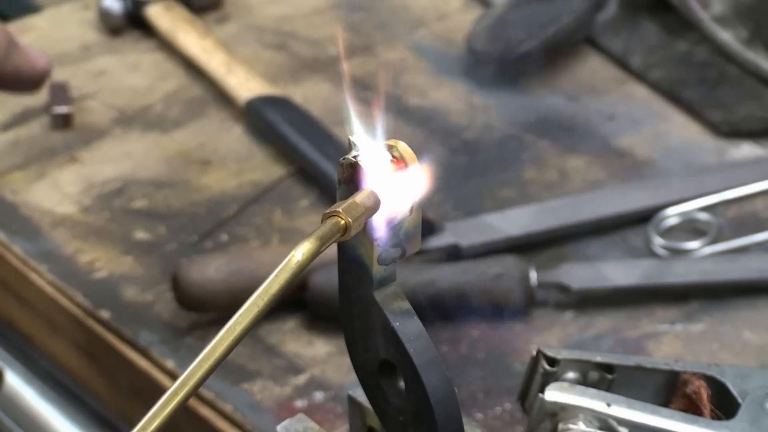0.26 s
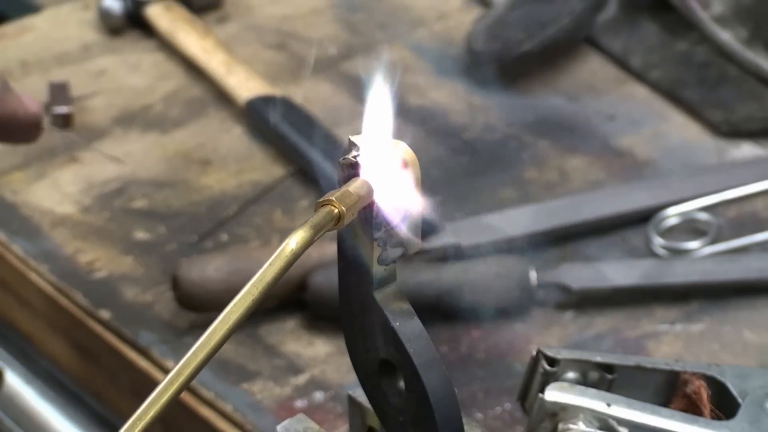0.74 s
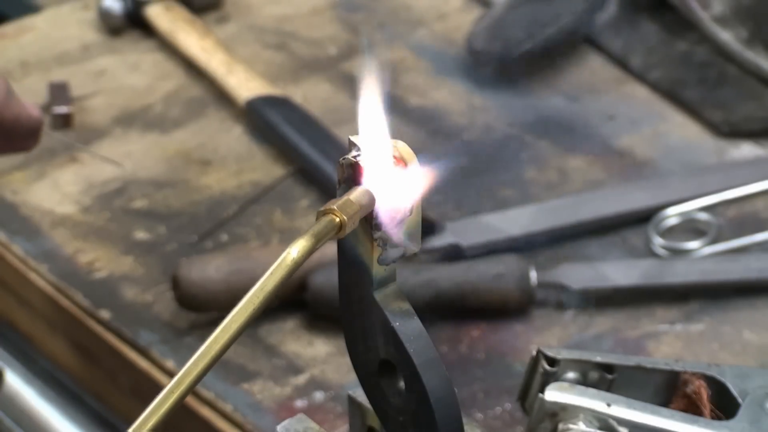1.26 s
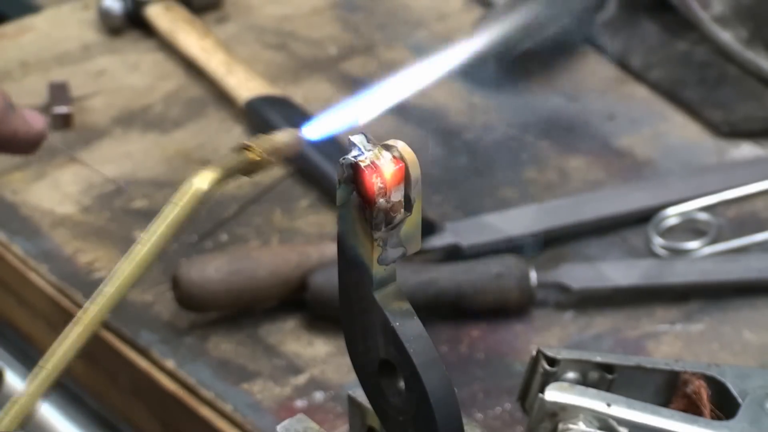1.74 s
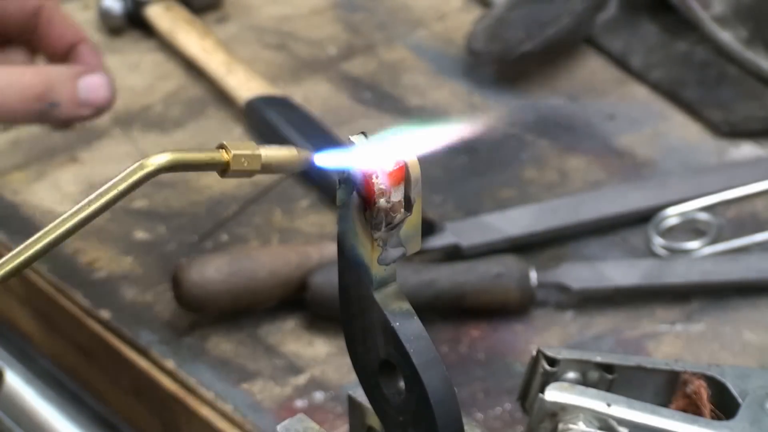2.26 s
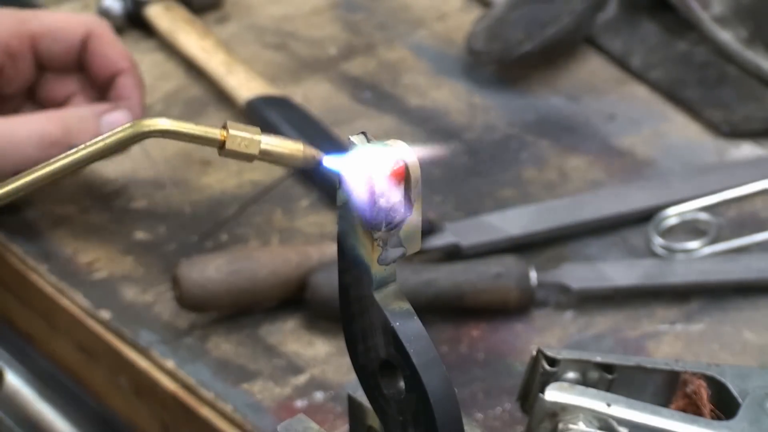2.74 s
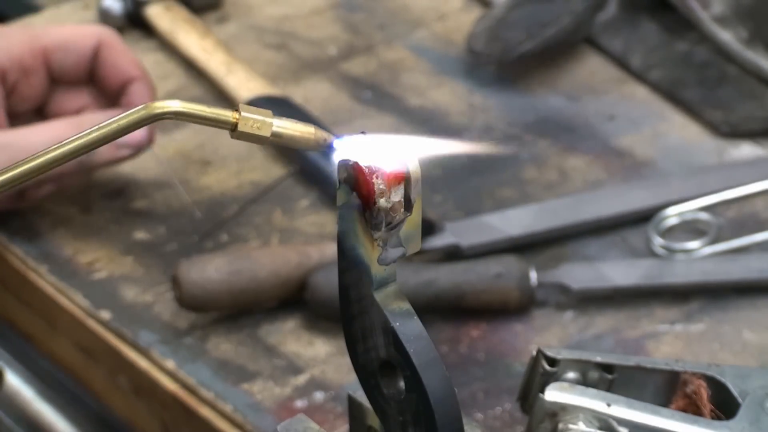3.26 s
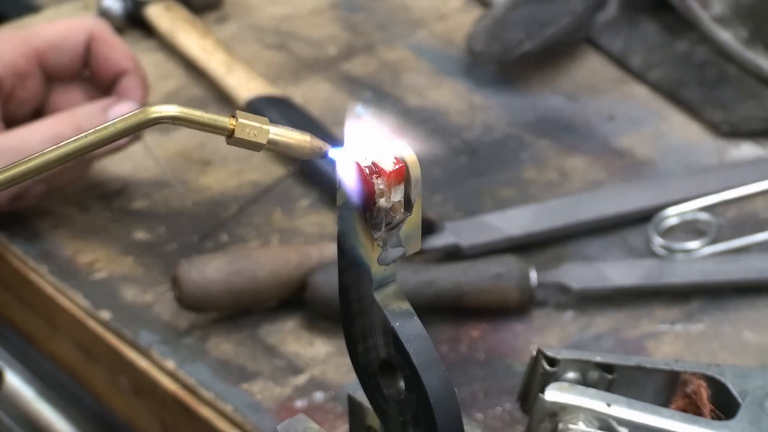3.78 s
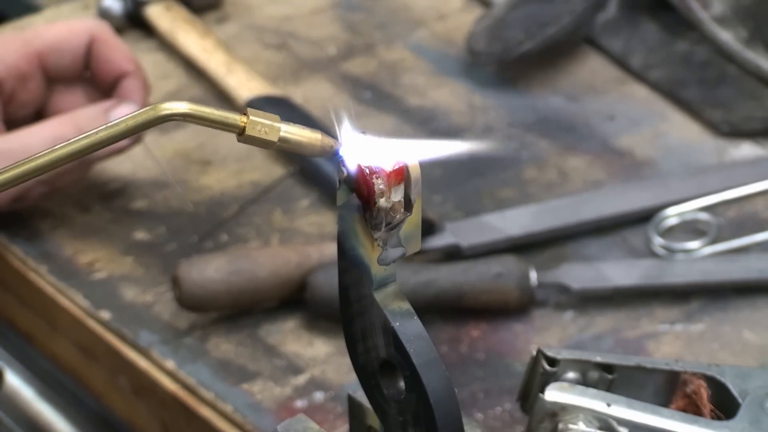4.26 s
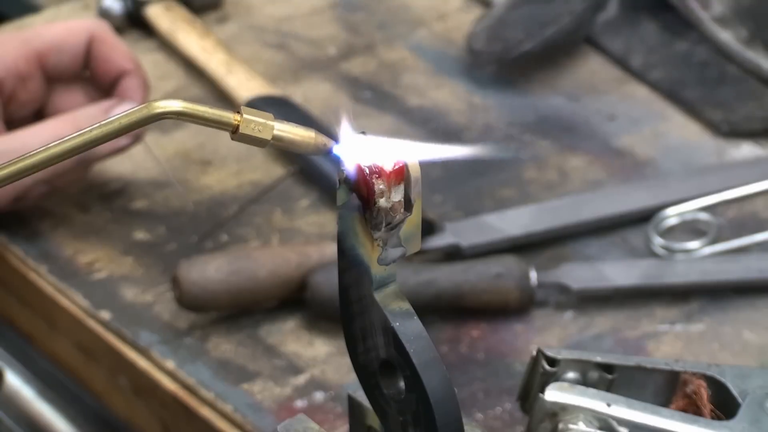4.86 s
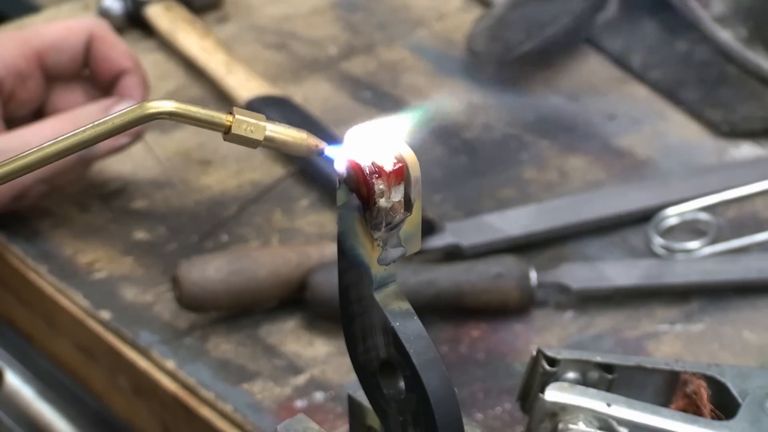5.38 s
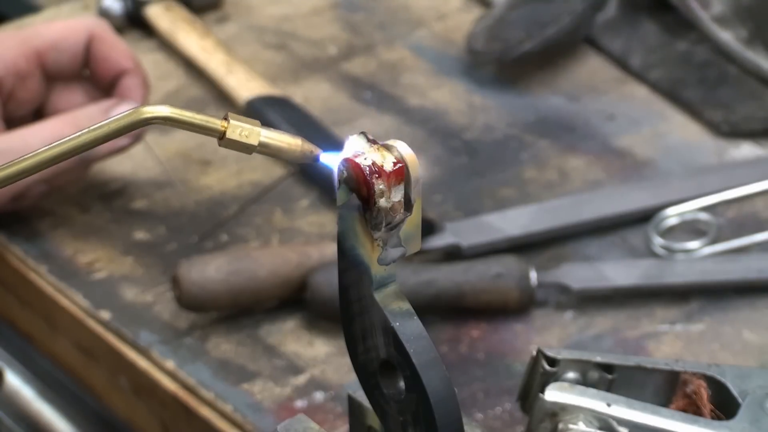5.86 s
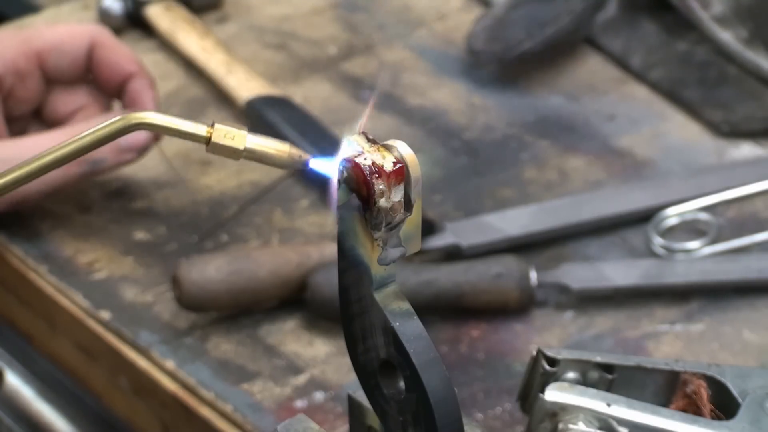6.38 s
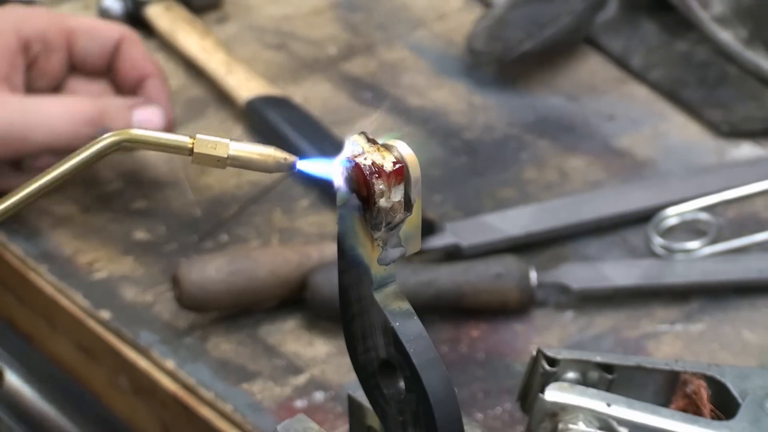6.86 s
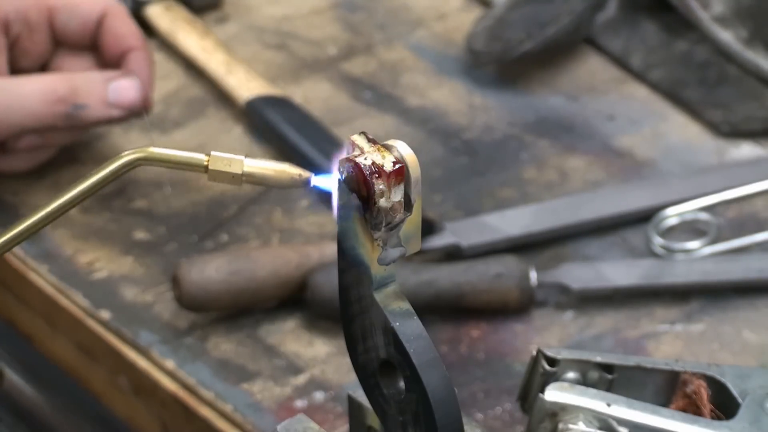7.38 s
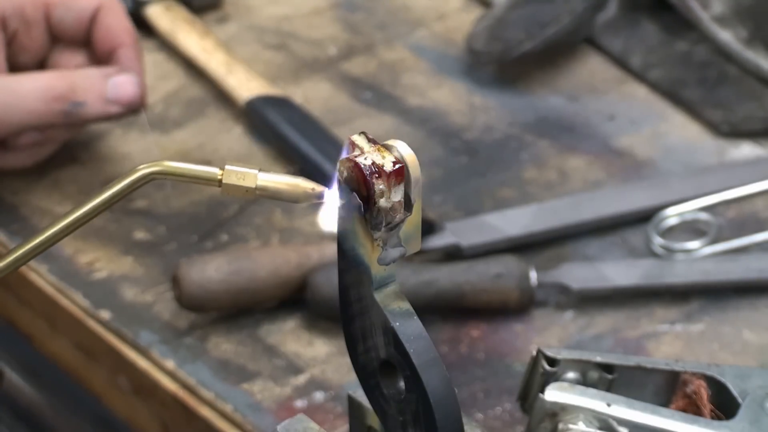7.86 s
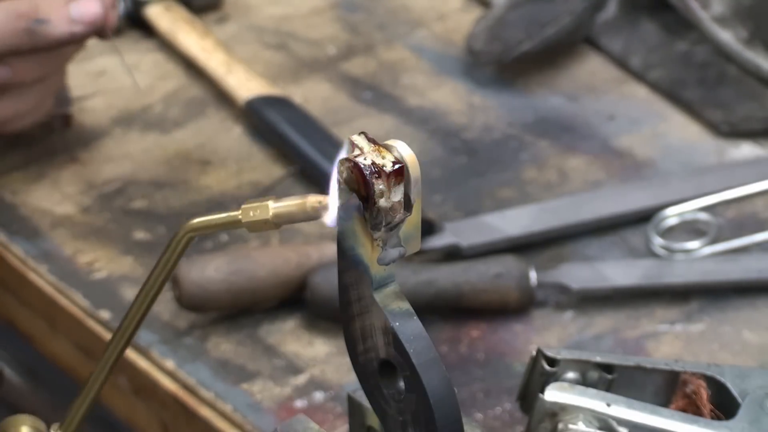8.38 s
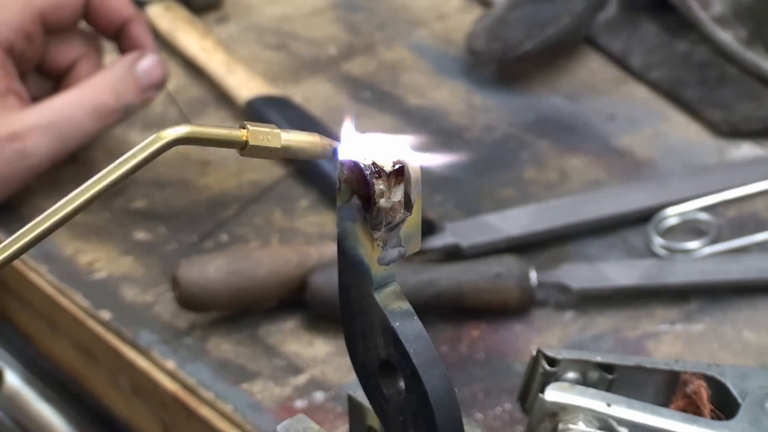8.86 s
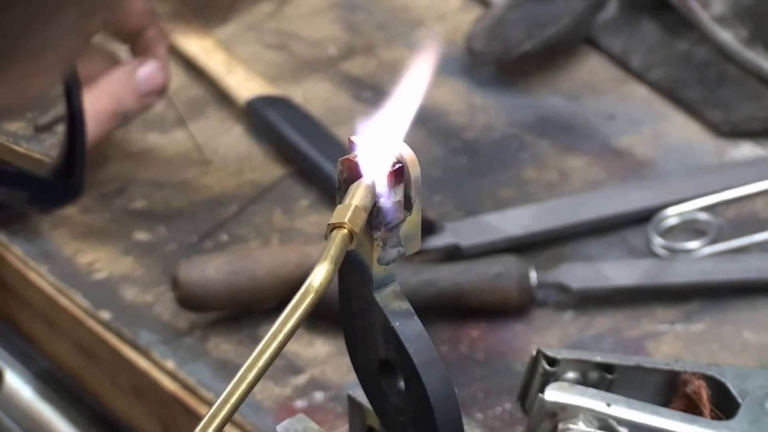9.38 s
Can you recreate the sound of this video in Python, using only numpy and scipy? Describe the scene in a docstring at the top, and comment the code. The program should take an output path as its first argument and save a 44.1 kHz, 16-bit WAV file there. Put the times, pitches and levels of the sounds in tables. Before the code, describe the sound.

Close, steady, bright torch hiss with faint low flutter and a few soft thuds, jumping at about eight seconds to a loud rushing flame.

```python
"""In a workshop, a gas torch heats a steel joint held in pliers over a bench.
The jet, band-shaped noise, hisses, flares and sputters on the steel; slower-fluttering noise forms a low rumble.
Filtered clicks ring damped modes as three dull knocks. At 8.1 s the flame turns turbulent at a stroke:
broadband noise with a shifting echo rushes loudly and briefly falters. Bench and workshop echo closely."""
import sys
import numpy as np
from scipy import signal
from scipy.fft import rfft, irfft, next_fast_len
from scipy.io import wavfile
from scipy.ndimage import map_coordinates

SR = 44100
rng = np.random.default_rng(int(sys.argv[2]) if len(sys.argv) > 2 else 0)


def put_to_file(sound):
    """Save the sound as 16-bit audio at rate SR, in the file named by the first command-line argument."""
    columns = np.atleast_2d(sound).T  # one column per channel
    safe = np.clip(columns, -1, 1)
    whole_steps = np.round(safe * 32767)
    wavfile.write(sys.argv[1], SR, whole_steps.astype(np.int16))


N = 424241
TIME = np.arange(N) / SR
SIZE = next_fast_len(N + SR // 2, True)
FREQS = np.fft.rfftfreq(SIZE, 1 / SR)

# All levels are relative, ahead of trims in the functions; spectra are densities per Hz.
# Dull knocks at the bench: t/s, level/dB, contact cut-off f/Hz, thud level/dB
KNOCKS = [(1.856, -51, 400, -70), (2.354, -52, 1500, -41.5), (2.769, -26.5, 2000, -43.5)]
# Modes a knock excites: f/Hz, level/dB, t60/s
KNOCK_MODES = [(564, -15, .14), (710, -13, 0.1), (840, 0.5, 0.024), (945, 0, 0.022), (1080, -19, 0.024)]
# Thud of the bench: f/Hz, level/dB
THUD_SPECTRUM = [(100, -12), (160, 2), (400, -3), (800, -5), (1300, 0), (1700, -12), (4000, -27)]

# Air drawn in by the smooth flame: f/Hz, level/dB
DRAUGHT_SPECTRUM = [(35, -24), (65, -2.5), (95, 4.5), (125, -6.5), (155, -3.5), (200, -39), (400, -45)]
# Deep draught once the torch is side-on: f/Hz, level/dB
DEEP_SPECTRUM = [(20, -1), (42, -2), (60, 0), (90, -20)]
# Soft blowing of the smooth flame: f/Hz, level/dB
BLOW_SPECTRUM = [(330, -45), (440, -6), (550, -4), (820, -1.5), (1100, -4.5), (1350, -5), (1550, 0),
                 (1900, -2.5), (2200, 2), (3500, -6.5), (7000, -5.5)]
# Rumble of the smooth flame: f/Hz, level/dB
RUMBLE_SPECTRUM = [(100, -13), (160, 1.5), (220, -3), (290, 1), (400, 1), (800, -11.5), (2000, -15)]
# Rumble, most when burning free, least when pressed flat on the steel: t/s, level/dB
RUMBLE = [(0.0, -62.5), (0.66, -70), (1.1, -62.6), (1.68, -72.5), (1.86, -59.6), (3.3, -61.5), (3.48, -74),
          (4.02, -63), (4.46, -73.6), (4.7, -66.4), (4.9, -78), (5.04, -61), (5.2, -67.5), (8.08, -62.5)]
# The rumble dies away briefly: middle t/s, length/s, depth/dB
LULLS = [(.64, .14, 16), (1.43, 0.18, 9), (3.1, 0.17, 10), (4.59, .16, 20), (6.45, 0.15, 19)]

# Jet as it plays over the steel: t/s, jet level/dB, edge sizzle level/dB
JET = [(0.0, -22, -34.8), (1.04, -23, -36), (1.16, -21, -35.0), (2.34, -22.5, -37.6), (3.46, -21, -34),
       (3.92, -24.0, -38.4), (4.16, -21.5, -36), (4.56, -22, -37), (4.94, -20.5, -27), (5.04, -23, -34),
       (5.38, -20.5, -34), (5.52, -22.7, -39), (6.02, -22, -36.6), (6.14, -24, -41), (6.54, -21.5, -39),
       (6.98, -22, -36.2), (7.08, -23, -39.4), (8.08, -24, -39)]
# Splash, most while the jet points at the steel's face: t/s, level/dB
SPLASH = [(0, -34.5), (.55, -31.5), (.72, -36), (1.02, -31), (1.25, -35.5), (1.5, -34), (2.8, -34),
          (2.98, -36), (5.0, -35), (5.38, -34.5), (5.6, -35.5), (8.08, -34.5)]
# The jet slips off its edge and the hiss thins: middle t/s, length/s, depth/dB
SLIPS = [(.145, 0.053, 4.5), (.285, .05, 5), (3.11, .04, 3), (3.29, .05, 3), (3.61, .05, 3),
         (4.08, .06, 1.5), (4.41, 0.08, 1), (5.1, .05, 2)]
# The jet catches an edge: start t/s, hold/s, flare level/dB, sizzle gain/dB, rumble and draught loss/dB
FLARES = [(.088, .02, -42, 6, 6), (0.215, .02, -28, 4, 4), (0.305, 0.13, -24, 5, 4),
          (0.492, .05, -31, 2, 5), (1.47, .02, -30, 3, 0), (3.575, .015, -49, 6, 1),
          (3.64, 0.11, -28, 10, 28), (4.115, .025, -40, 6, -1), (5.26, .12, -33, 2, 5)]
# Free jet: f/Hz, level/dB
JET_SPECTRUM = [(2000, -30), (4000, -19), (5500, -15), (6400, -6), (7100, -2), (7800, -3), (9000, -2),
                (10300, 0), (11150, -0.5), (11650, 4.5), (12400, 0.5), (13400, 0), (14000, -11.5),
                (16000, -25)]
# Splash on the steel: f/Hz, level/dB
SPLASH_SPECTRUM = [(1200, -24.5), (2300, -14.5), (3500, -5.5), (4400, -2.5), (5300, 3), (6500, 5),
                   (9000, -15), (13000, -32)]
# Sizzle on the edges: f/Hz, level/dB
SIZZLE_SPECTRUM = [(8000, -29), (11000, -7), (13500, 5.5), (15000, 6), (16000, 3)]
# Flare on an edge: f/Hz, level/dB
FLARE_SPECTRUM = [(2800, -22), (4200, -6.5), (5200, 0.5), (7000, 2.5), (9000, -6), (11700, 4), (14000, -26)]

# Turbulent flame: t/s, roar level/dB, hiss level/dB
RUSH = [(8.1, -27, -23.5), (8.3, -28, -24), (8.42, -29.5, -25.5), (8.64, -27.5, -23.5), (8.98, -27, -25),
        (9.12, -27, -23.5), (9.62, -28, -24)]
# Roar of the turbulent flame: f/Hz, level/dB
RUSH_SPECTRUM = [(20, -2.5), (120, -3), (260, 1), (430, -1), (780, -1.5), (1150, -1), (2700, -1.5),
                 (5000, -2), (7000, -6), (10000, -14), (16000, -24)]
# Bright hiss of the turbulent flame: f/Hz, level/dB
RUSH_HISS_SPECTRUM = [(3500, -26), (6000, -7), (8000, -3), (10000, 0), (12300, -1), (13200, -.5),
                      (14000, -1.5), (16000, -3)]
# Echo off the steel beside the turbulent flame: t/s, delay/ms, strength/1
STEEL_ECHO = [(8.1, 0.76, 0.1), (8.4, 0.59, 0.05), (8.6, 0.67, 0.1), (8.85, 0.7, 0.45), (9.1, 0.72, 0.37),
              (9.3, 0.63, 0), (9.45, 0.72, .24), (9.62, 0.69, 0.25)]
# The flame falters: deepest t/s, fade/s, recovery/s, depth/dB
FALTERS = [(8.433, 0.0099, 0.019, 6.5), (8.468, 0.025, 0.025, 13.5), (9.033, 0.023, 0.0063, 11)]

# Stereo side against mid, for smooth flame, jet and knocks: f/Hz, level/dB
WIDTH = [(20, -15), (120, -6.5), (400, -3.5), (750, -5), (1280, -4.5), (2000, -13.5), (3500, -17.5),
         (6500, -21), (8000, -15), (11100, -7.5), (11700, -22), (13200, -37), (14500, -20), (15600, -25)]
# Stereo side against mid, for the turbulent flame: f/Hz, level/dB
RUSH_WIDTH = [(60, -10), (250, -14.5), (700, -8.5), (1400, -13), (3500, -10), (8200, -7.5), (9400, -26),
              (15000, -36)]
# Stereo width over time: t/s, side level/dB
WIDTH_IN_TIME = [(0, 0.5), (5.3, -.5), (5.8, .5), (7.0, 0.5), (7.4, 1.5), (8.6, 1.5), (8.85, -1.3),
                 (9.62, -0.5)]

RUSH_START_S = 8.098
BENCH_ECHO_S, CUTOFF_HZ = .003448, 15800
FLARE_ATTACK_S, FLARE_RELEASE_S = .008, 0.06
SLIP_SIZZLE = 2.2   # dB of sizzle lost per dB of hiss
DRAUGHT_DB, DRAUGHT_FOLLOWS = -67, 0.35   # level; share of the rumble's swing in dB
BLOW_DB, BLOW_FOLLOWS = -49.5, 0.12   # level; share of the rumble's swing in dB
TURN_S, TURN_LENGTH_S, DEEP_DB = 1.3, .8, -69.5   # the torch swings side-on and a deep draught joins in
KNOCK_SIDE_DB = -9   # the knocks stand nearer the centre
GUTTER_DB, GUTTER_PER_S = 4, 5.9   # depth at one spread of the drift; its rate


def from_db(db):
    """Level law: twenty decibels are a factor of ten in amplitude."""
    return 10 ** (np.asarray(db) / 20)


def rms_one(x):
    """Normalization: division by the root mean square gives unit power."""
    return x / np.sqrt(np.mean(x ** 2) + 1e-20)


def in_time(rows):
    """Linear interpolation: each column of a time table is read at every sample."""
    s, *columns = np.transpose(rows)
    return [np.interp(TIME, s, c) for c in columns]


def dips(rows):
    """Raised-cosine windowing: brief, smooth losses in dB are summed."""
    loss_db = 0
    for middle, length, depth_db in rows:
        phase = np.pi * np.clip((TIME - middle) / length, -.5, .5)
        loss_db = loss_db + depth_db * np.cos(phase) ** 2
    return loss_db


def colour(points):
    """Spectral shaping: gain follows log frequency, with second-order skirts beyond the end points."""
    hz, db = np.transpose(points)
    gain = from_db(np.interp(np.log(FREQS + 1), np.log(hz), db))
    low_skirt = np.minimum(FREQS / hz[0], 1) ** 2
    high_skirt = (hz[-1] / np.maximum(FREQS, hz[-1])) ** 2
    return gain * low_skirt * high_skirt


def filtered(x, response):
    """Convolution theorem: filtering is multiplication of spectra."""
    return irfft(rfft(x, SIZE) * response, SIZE)[..., :N]


def drift(rate):
    """Low-passed random process: wander up to about `rate` times a second, with unit spread."""
    step = 40   # samples between computed points
    white = rfft(rng.standard_normal(SIZE // step))
    slow = irfft(white / (1 + (FREQS[:len(white)] / rate) ** 2))
    return np.interp(np.arange(N) / step, np.arange(len(slow)), rms_one(slow))


def turbulence(spectrum, flutter_db, flutter_rate):
    """Flow noise: passing eddies modulate noise, which is then coloured and set to unit rms."""
    eddies = from_db(flutter_db * drift(flutter_rate))
    return rms_one(filtered(rng.standard_normal(N) * eddies, colour(spectrum)))


def scattered(x, strength, longest_s, rate, count=8):
    """Interference: near reflections swell and fade, so ridges and hollows wander through the spectrum."""
    lags = np.linspace(longest_s / count, longest_s, count) * rng.uniform(.85, 1.15, count)
    echoes = sum(drift(rate) * np.roll(x, round(lag * SR)) for lag in lags) / np.sqrt(count)
    return (x + strength * echoes) / np.sqrt(1 + strength ** 2)


def spread(x, width, side_db):
    """Decorrelation: the side is the same sound, coloured by a width curve, delayed and smeared in phase."""
    smear = rfft(rng.standard_normal(N) * TIME * np.exp(-TIME / .012), SIZE)
    side = from_db(side_db) * filtered(x, colour(width) * smear / np.abs(smear))
    return np.array([x + side, x - side])


def workshop(x, t60, wet_db):
    """Reverberation: scattered reflections off tools and walls die away exponentially."""
    tail = rng.standard_normal(N) * from_db(-60 * TIME / t60) * (TIME > BENCH_ECHO_S)
    return from_db(wet_db) * filtered(x, rfft(tail / np.linalg.norm(tail), SIZE))


def ring(x, hz, t60):
    """Damped resonance: a unit click sets a sine of about unit height ringing."""
    r, w = from_db(-60 / (t60 * SR)), 2 * np.pi * hz / SR
    return signal.lfilter([0, np.sin(w)], [1, -2 * r * np.cos(w), r * r], x + 1e-18)


def knocks(thud_t60, slap_s, slap_db):
    """Modal excitation: each blow rings the modes, shakes the bench with a thud and echoes off a wall."""
    force, thud = np.zeros(N), np.zeros(N)
    for s, db, soft_hz, thud_db in KNOCKS:
        click = from_db(db) * (np.arange(N) == round(s * SR))
        contact = signal.butter(2, soft_hz, fs=SR, output="sos")
        force += signal.sosfilt(contact, click + 1e-18)
        thud += (TIME >= s) * from_db(thud_db - 60 * np.abs(TIME - s) / thud_t60)
    body = sum(from_db(db) * ring(force, hz, t60) for hz, db, t60 in KNOCK_MODES)
    small_body = signal.butter(2, [450, 1400], "band", fs=SR, output="sos")
    body = signal.sosfilt(small_body, body)
    body = body + from_db(slap_db) * np.interp(TIME - slap_s, TIME, body)
    thud = thud * rms_one(filtered(rng.standard_normal(N), colour(THUD_SPECTRUM)))
    return body + workshop(body, t60=0.39, wet_db=-1) + thud


def guttering():
    """Half-wave rectification: positive swings of a drift cut the gain; negative swings leave it whole."""
    return from_db(-GUTTER_DB * np.maximum(drift(GUTTER_PER_S), 0) ** 2)


def burning(quench_db):
    """Combustion noise: the smooth flame draws air, rumbles and blows; flares generally quench it."""
    rumble_db, = in_time(RUMBLE)
    swing_db = rumble_db - np.mean(rumble_db)
    side_on = np.clip((TIME - TURN_S) / TURN_LENGTH_S, 0, 1)
    draught_gain = from_db(DRAUGHT_DB + DRAUGHT_FOLLOWS * swing_db)
    draught = draught_gain * turbulence(DRAUGHT_SPECTRUM, flutter_db=1.5, flutter_rate=6)
    deep = side_on * from_db(DEEP_DB) * turbulence(DEEP_SPECTRUM, flutter_db=1.5, flutter_rate=6)
    rumble_gain = from_db(rumble_db - dips(LULLS) - quench_db + 3.0)
    rumble = rumble_gain * turbulence(RUMBLE_SPECTRUM, flutter_db=1.8, flutter_rate=10)
    blow_gain = from_db(BLOW_DB + BLOW_FOLLOWS * (swing_db - quench_db))
    blow = blow_gain * turbulence(BLOW_SPECTRUM, flutter_db=1.06, flutter_rate=24)
    air = from_db(-quench_db) * guttering() * (draught + deep)
    return air + scattered(guttering() * rumble + blow, strength=0.83, longest_s=.009, rate=3.5)


def steadiness():
    """Amplitude modulation: the flame sags for a moment and catches again."""
    sag_db = sum(np.interp(TIME, [s - fade, s, s + back], [0, db, 0]) for s, fade, back, db in FALTERS)
    return from_db(-sag_db)


def rush():
    """Comb filtering: a short, shifting echo off the steel hollows the turbulent flame's roar and hiss."""
    roar_db, hiss_db = in_time(RUSH)
    delay_ms, strength = in_time(STEEL_ECHO)
    roar = from_db(roar_db + 1.2) * turbulence(RUSH_SPECTRUM, flutter_db=1.0, flutter_rate=88)
    bright = from_db(hiss_db) * turbulence(RUSH_HISS_SPECTRUM, flutter_db=1.44, flutter_rate=83)
    flame = roar + bright
    delay_ms = delay_ms + 0.013 * drift(10)   # the flame trembles against the steel
    echo = map_coordinates(flame, [(TIME - delay_ms / 10 ** 3) * SR], order=3)
    return scattered(flame + strength * echo, strength=.3, longest_s=.002, rate=6)


def flaring():
    """Envelope gating: flares rise fast, hold and let go; yields flare gain, sizzle gain/dB, bass loss/dB."""
    gates = []
    for s, hold, *_ in FLARES:
        corners = [s - FLARE_ATTACK_S, s, s + hold, s + hold + FLARE_RELEASE_S]
        gates.append(np.interp(TIME, corners, [0, 1, 1, 0]))
    _, _, db, sizzle_db, quench_db = np.transpose(FLARES)
    return np.array([from_db(db), sizzle_db, quench_db]) @ np.array(gates)


def hiss(flare, more_sizzle_db):
    """Jet noise: the nozzle's jet splashes and sizzles on steel; hand tremor moves jet and sizzle together."""
    jet_db, sizzle_db = in_time(JET)
    splash_db, = in_time(SPLASH)
    tremor, slip_db = drift(9), dips(SLIPS)
    jet_db = jet_db - slip_db + 0.44 * tremor
    sizzle_db = sizzle_db - SLIP_SIZZLE * slip_db + 1.4 * tremor
    flare = flare * turbulence(FLARE_SPECTRUM, flutter_db=0.45, flutter_rate=70)
    jet = from_db(jet_db + 0.1) * turbulence(JET_SPECTRUM, flutter_db=0.5, flutter_rate=140)
    splash = from_db(splash_db) * turbulence(SPLASH_SPECTRUM, flutter_db=1.4, flutter_rate=18)
    sizzle_gain = from_db(sizzle_db + more_sizzle_db + 1.7)
    sizzle = sizzle_gain * turbulence(SIZZLE_SPECTRUM, flutter_db=0.5, flutter_rate=45)
    # the top and the sizzle flicker fast and irregularly, more deeply where the sizzle is louder
    flicker_db = 0.76 * from_db(sizzle_db - np.mean(sizzle_db))
    flicker = from_db(flicker_db * drift(80))
    top = filtered(jet, colour([(6500, -25), (8500, -5), (10000, 0), (20000, 0)]))
    whole = jet - top + flicker * (top + sizzle) + splash + flare
    return scattered(whole, strength=0.3, longest_s=.0022, rate=1.6)


def scene():
    """Superposition: the jet gives way to the rush over knocks and smooth flame, almost centred."""
    turbulent = np.clip((TIME - RUSH_START_S) / 0.0014, 0, 1)
    flare, sizzle_db, quench_db = flaring()
    side_db, = in_time(WIDTH_IN_TIME)
    jet = hiss(flare, sizzle_db) * steadiness() * (1 - 0.92 * turbulent)
    bench = 0.38 * np.roll(jet, round(BENCH_ECHO_S * SR))   # combs the hiss into fine ridges
    jet = .91 * (jet + bench + workshop(jet, t60=.13, wet_db=-7))
    roar = rush() * steadiness() * turbulent
    roar = roar + workshop(roar, t60=0.089, wet_db=-12)
    torch = spread(jet + burning(quench_db), WIDTH, side_db) + spread(roar, RUSH_WIDTH, side_db)
    bumps = spread(knocks(thud_t60=0.46, slap_s=.0142, slap_db=-4), WIDTH, KNOCK_SIDE_DB)
    return (torch + bumps) * from_db([[-.12], [.12]])   # left, right


def record(dry):
    """Elliptic low-pass filtering: the top is cut steeply."""
    low_pass = signal.ellip(12, .1, 80, CUTOFF_HZ, fs=SR, output="sos")   # order, ripple/dB, stop/dB
    return signal.sosfilt(low_pass, dry)


dry = scene()
out = record(dry)
put_to_file(out)
```